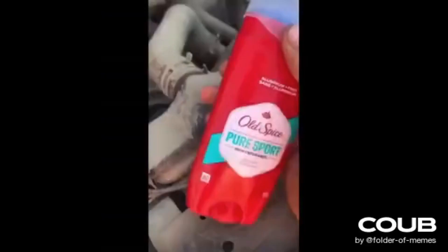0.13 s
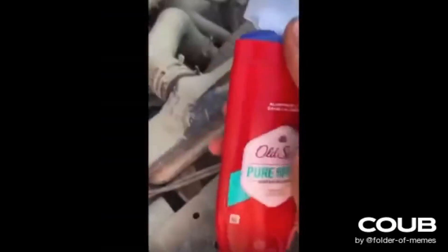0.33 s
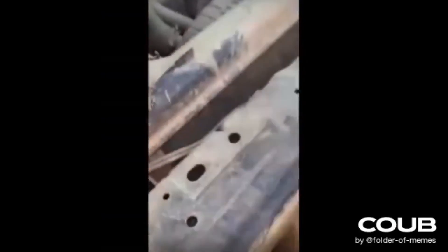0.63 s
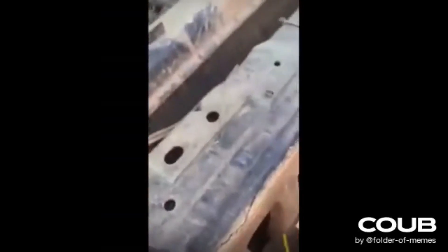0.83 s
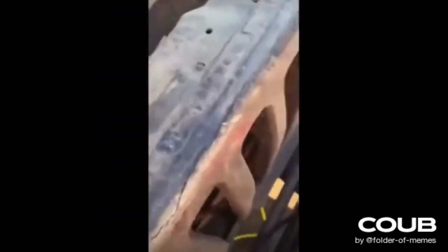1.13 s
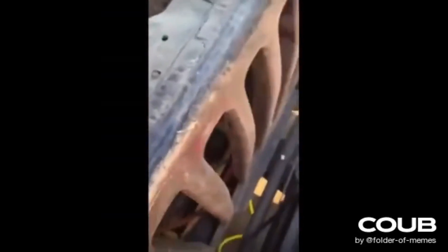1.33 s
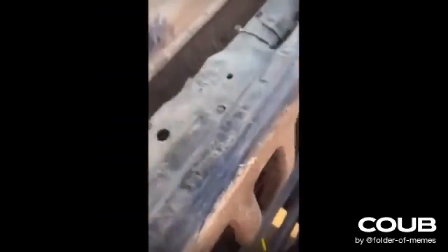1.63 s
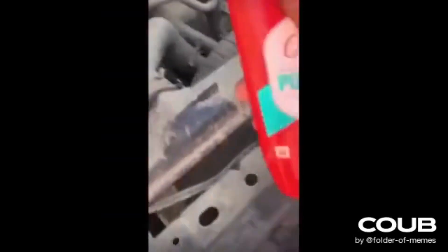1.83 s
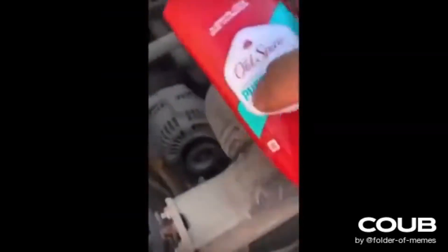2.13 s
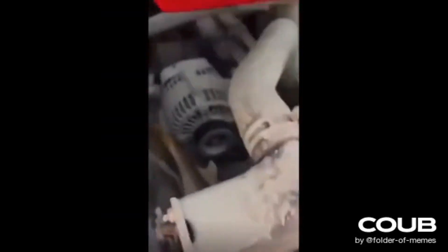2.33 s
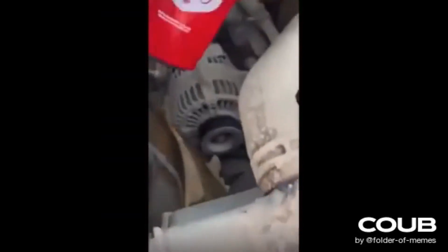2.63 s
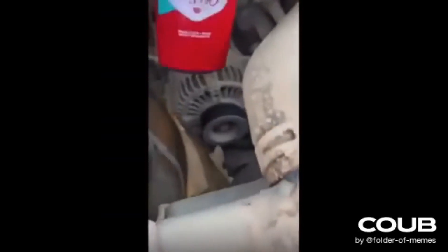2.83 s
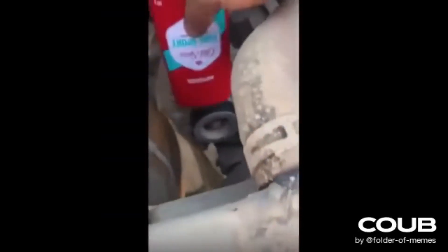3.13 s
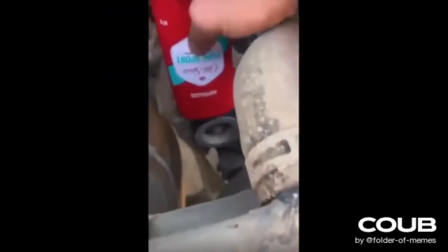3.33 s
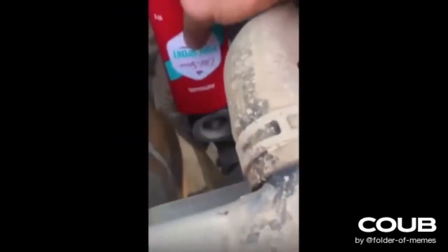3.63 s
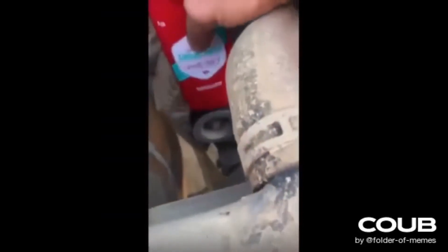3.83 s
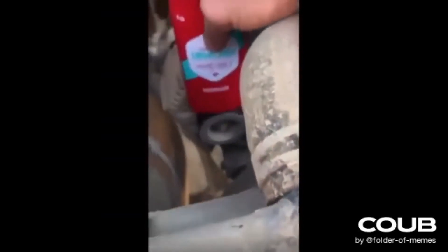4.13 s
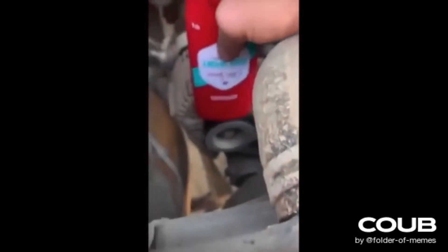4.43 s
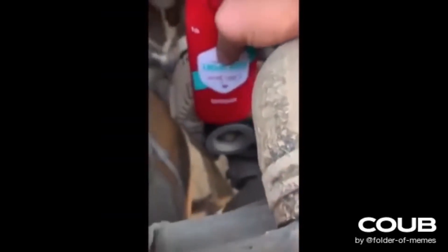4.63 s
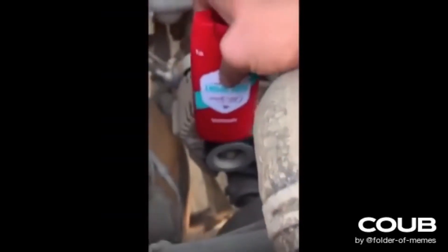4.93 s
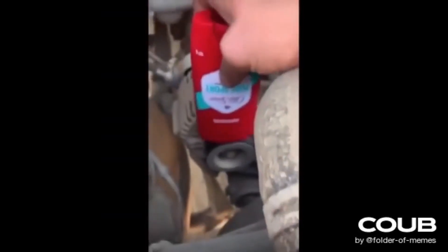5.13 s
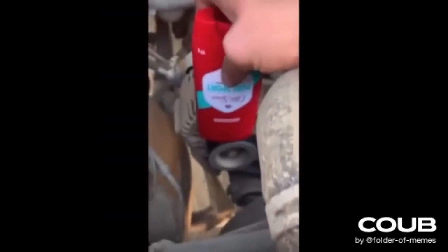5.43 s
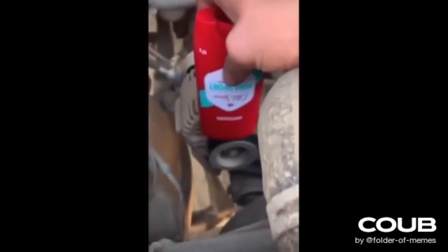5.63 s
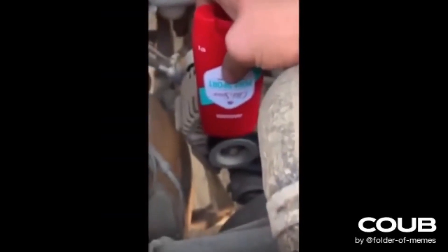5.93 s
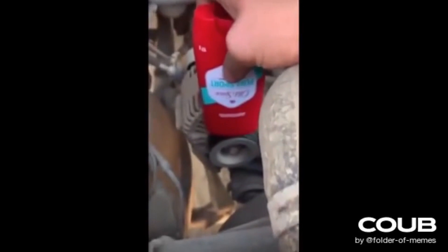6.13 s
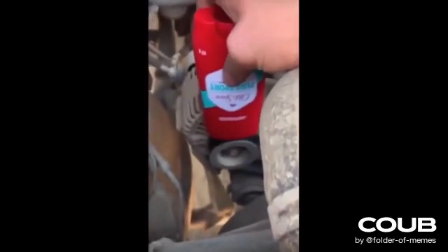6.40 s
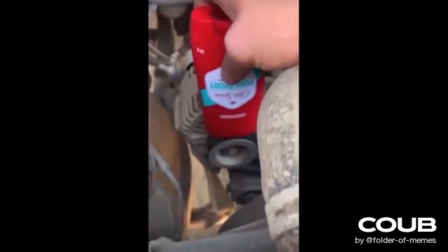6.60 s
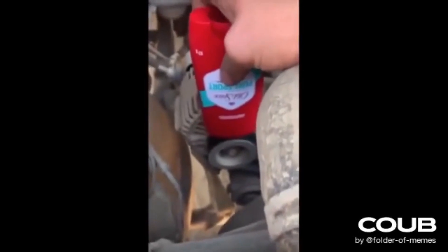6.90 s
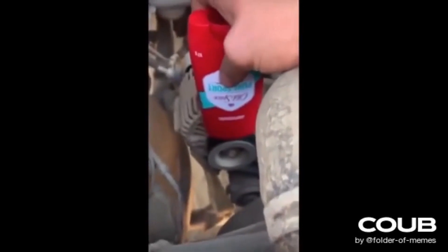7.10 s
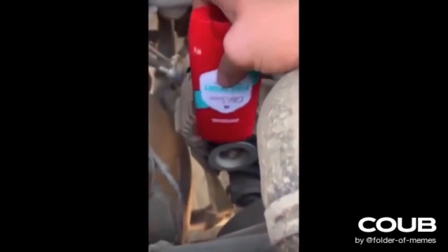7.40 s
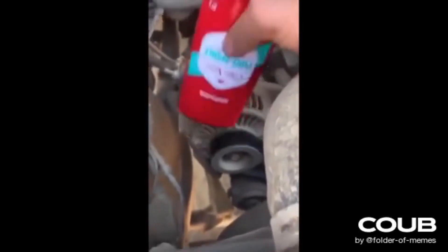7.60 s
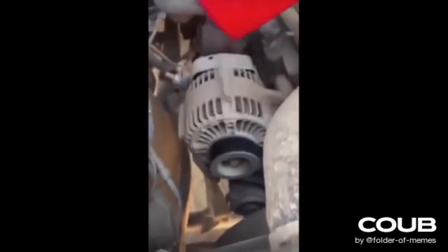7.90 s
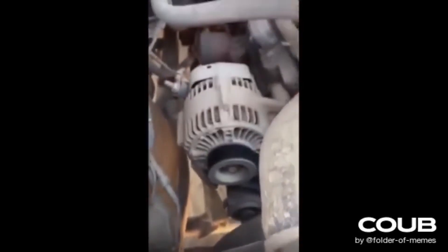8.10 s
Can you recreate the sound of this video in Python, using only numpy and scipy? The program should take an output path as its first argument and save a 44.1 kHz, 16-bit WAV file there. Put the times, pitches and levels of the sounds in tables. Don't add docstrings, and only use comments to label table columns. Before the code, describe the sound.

A harsh, fast-chattering belt squeal screams over an idling engine, breaks into scattered chirps, then stops, leaving only the rough engine rumble.

```python
import sys
import numpy as np
from scipy import signal
from scipy.io import wavfile
from scipy.ndimage import uniform_filter1d

SR = 44100
rng = np.random.default_rng(int(sys.argv[2]) if len(sys.argv) > 2 else 0)


def generate_wav(signal):
    frames = np.transpose(np.atleast_2d(signal))
    scaled = np.clip(frames, -1, 1) * 32767
    pcm = np.round(scaled).astype(np.int16)
    wavfile.write(sys.argv[1], SR, pcm)


def voltage_ratio(decibels):
    exponent = np.asarray(decibels, float) / 20
    return 10 ** exponent


N = 364089
T = np.arange(N) / SR
YARD_END_S, ENGINE_START_S = 0.062, 0.354
SPLIT_HZ = 6520
LOW_HZ, HIGH_HZ = 3165, 5560
FIRING_HZ = 36.13

# (time [s], distance run [laps])
BELT_LAPS = [(.36, 1.542), (1.2, 5.059), (2, 8.423), (2.8, 11.805), (3.6, 15.166), (4.4, 18.494),
             (5.1, 21.399), (5.8, 24.294), (6.2, 25.96), (6.65, 27.87), (8.3, 34.75)]
# (low bite [dB], low pitch shift [Hz], high bite [dB], high pitch shift [Hz])
BELT_GLAZE = [(2, 60.0, -2, 349.5), (-1.5, 115.0, 2, -200.0), (-3.5, 180.0, 4.7, -150.0),
              (-1.5, 290.0, 1.52, -60.0), (-2.5, 140.0, -0.5, -90.0), (-0.5, -200.0, -4, 20.5),
              (2, -200.0, -3, -40.0), (-2, -100.0, -0.5, -50.5), (-2, -30.0, 0.8, -80.0),
              (0.6, 5.0, 3, -180.0), (2.5, 60.0, 0.3, 0.0), (2.3, 115.0, -0.2, 99.5),
              (0.3, 175.0, -0.3, 200.0), (-0.2, 115.0, 1.3, 220.0), (0.16, 0.0, -1, 260.0),
              (0.2, -5.0, -0.56, 50.0), (-2, -15.0, 2.7, -20.0), (0, -45.0, 0.7, -40.0),
              (0.3, -55.0, 0, -0.5), (-1.2, 0.0, 0.5, -59.5), (1.2, -70.0, 3, -220.0),
              (1, -30.0, 5, -170.0), (-0.8, 20.0, 0.3, 20.5), (-1.5, 45.0, 0.5, 120.0),
              (-0.7, 50.0, -2, 450.0), (3, 110.0, -3.5, 500.0), (3.5, 70.0, -1.7, 400.0),
              (2, 35.0, -1.5, 400.0), (2.5, -95.0, -2, 400.5), (1.5, -25.0, 1.44, 390.0)]
# (time [s], low slip [dB], high slip [dB], slipping share of a turn [0-1], creep between slips [dB])
WAX_STAGES = [
    (.35, -20.5, -20, 0.81, -25),
    (1, -18.5, -23, 0.63, -21.5),
    (1.6, -23.5, -23.5, 0.72, -24.5),
    (2.3, -20, -24, 0.74, -25),
    (3, -19.5, -22.5, 0.64, -23.5),
    (3.7, -17.5, -26.5, 0.79, -26.5),
    (4.3, -18, -26.5, 0.55, -34),
    (5, -22, -33, .5, -38.5),
    (5.75, -19, -37, .4, -44.5),
    (8.3, -20, -40, .3, -50),
]
# (start [s], length [s], low level [dB], high level [dB])
LAST_SLIPS = [(4.377, 0.04, -19, -28.5), (4.441, 0.034, -19.5, -29.5), (4.483, 0.017, -25, -45),
              (4.508, 0.035, -19, -30), (4.585, 0.012, -15.5, -30), (4.638, 0.038, -25, -37),
              (4.716, .023, -19, -27.5), (4.782, .021, -27, -29), (4.839, 0.041, -19.5, -30.5),
              (4.919, 0.0092, -12.5, -36), (4.973, 0.033, -18.5, -32), (5.048, 0.031, -25, -45),
              (5.099, 0.0076, -23, -45), (5.115, 0.016, -17.5, -31.5), (5.171, 0.04, -22, -38),
              (5.239, 0.054, -30.5, -35.5), (5.318, 0.016, -16.5, -33), (5.385, .018, -21, -34),
              (5.443, 0.025, -19, -29), (5.515, 0.013, -19.5, -42), (5.577, 0.022, -19, -33.5),
              (5.646, 0.014, -18, -43), (5.703, 0.017, -20, -42), (5.928, .015, -26, -38.5),
              (6.048, 0.012, -38, -55), (6.174, 0.012, -20, -40), (6.52, 0.016, -34, -55),
              (6.646, .024, -26, -50), (6.772, .014, -26.5, -47), (6.9, .03, -33, -50)]
# (time [s], extra side mode level [dB])
WAXED_SIDE_MODE = [(5.4, -0.5), (6.0, 5)]
# (frequency [Hz], density [dB per Hz])
RUBBER_RASP = [(880, -39.5), (1500, -40.5), (1740, -21), (2600, -10.5), (3220, -5.5), (4150, -14.5),
               (4840, -11.5), (5480, -11), (6160, -14.5), (6600, -8.5), (8580, -52.5), (14500, -120)]
# (time [s], rumble level [dB], fan and valve roar level [dB])
ENGINE_BAY = [(.35, -22, -27.5), (.8, -24.5, -30), (1.3, -25, -30), (1.8, -24.5, -29), (2.7, -26, -31),
              (3.3, -26.5, -33), (3.9, -28.5, -34), (4.6, -30, -34.5), (5.9, -29, -31.5), (6.5, -27, -29),
              (7.3, -26, -28.5), (8.3, -26, -27.5)]
# (frequency [Hz], density [dB per Hz])
ENGINE_RUMBLE = [(20, -30), (33, -22), (72, -6), (180, -3.5), (377, -4.5), (432, -8.5), (565, -6.5),
                 (647, -16.5), (900, -18.5), (1200, -36)]
# (frequency [Hz], density [dB per Hz])
FAN_ROAR = [(350, -25.5), (600, -10.5), (637, -5), (933, -9), (1270, -6), (1860, -5.5), (2100, -6),
            (2650, -9), (3270, -15.5), (4790, -20.5), (6600, -24.5), (8580, -57.5), (14500, -120)]
# (time [s], third level [dB], fifth level [dB], seventh level [dB])
HALF_ORDERS = [(.35, -30, -55, -24.5), (1.2, -29.5, -45.5, -33), (2.2, -28.5, -37.5, -31),
               (3.2, -27.5, -38, -33), (4.4, -32, -37, -34.5), (5.6, -29, -34, -32.5),
               (6.6, -28.5, -29.5, -29), (7.1, -25.5, -35, -26.5), (7.6, -29, -21.5, -36.5),
               (8.3, -23, -38, -27.5)]
HALF_ORDER_HZ = [53.9, 90.5, 127.4]
# (time [s], peak level [dB], frequency [Hz])
SMALL_KNOCKS = [
    (1.584, 14, 1992),
    (1.711, 14, 1987),
    (5.583, -15, 2000),
    (6.209, -10, 2000),
]
# (frequency [Hz], density [dB per Hz])
YARD_RUMBLE = [(30, -15.5), (120, -1.5), (170, -9), (300, -23), (900, -30.5), (1250, -27.5), (3000, -39.5),
               (13000, -58)]
# (frequency [Hz], density [dB per Hz])
FOLLOWING_TREBLE = [(6500, -50), (6530, -4), (6900, 0), (7400, -4), (8300, -8), (8330, -60)]
# (start [s], end [s])
LAST_BAND_SPANS = [(.35, 1.56), (1.92, 2.54), (2.66, 2.72), (3.1, 3.17), (3.88, 3.93), (4.2, 4.35),
                   (4.85, 4.95), (5.3, 5.36), (5.57, 5.62), (5.74, 8.3)]
# (start [s], end [s], frequency [Hz], level [dB])
WHISTLES = [
    (.5, .75, 9819, -62),
    (1.6, 1.92, 7752, -50),
    (2.87, 3.58, 7752, -50),
    (2.66, 2.71, 8556, -52),
]


def belt():
    start, length, low_db, high_db = slip_rows().T
    creep = voltage_ratio(curve(WAX_STAGES, column=4) + glaze(column=0))
    low = np.hypot(slips(start, length, low_db, 770), creep) * voltage_ratio(glaze(column=0))
    high_length = np.maximum(0.86 * length, 0.029)
    high = slips(start - 0.0039, high_length, high_db, 830)
    high = np.hypot(high, creep * voltage_ratio(-8)) * voltage_ratio(glaze(column=2))

    low_swing = 1.3 * np.interp(T, [1.5, 5.5], [1.15, 0.65])
    low_hz = LOW_HZ + low_swing * glaze(column=1)
    high_hz = HIGH_HZ + 1.1 * glaze(column=3)
    chatter_hz = np.interp(T, [1.8, 2.6], [65, 35])

    low_main_db = -1.0 - 0.01 * abs(low_hz - LOW_HZ)
    low_main = voltage_ratio(low_main_db) * tone(low_hz + chatter_hz * wander(40), 120, 0.5)
    low_side_db = -17.5 + curve(WAXED_SIDE_MODE, column=1) + 0.05 * glaze(column=1) + 3.4 * wander(29)
    low_side = voltage_ratio(low_side_db) * tone(3640 + 60 * wander(40), 91, 0.12)

    mode_hop = np.cos(2 * np.pi * (high_hz - 5570) / 420)
    high_main_db = -5.5 + 3.0 * mode_hop + 2.1 * wander(30)
    high_main = voltage_ratio(high_main_db) * tone(high_hz + 1.7 * chatter_hz * wander(60), 150, 0.4)
    high_side_db = -16.5 + 0.0338 * glaze(column=3) + 4.0 * wander(21)
    high_side = voltage_ratio(high_side_db) * tone(6250 + 120 * wander(30), 120, 0.41)

    rasp = np.hypot(low * voltage_ratio(-12), high * 0.85) * shaped(RUBBER_RASP, patchy_db=3.5)
    out = low * (low_main + low_side) + high * (high_main + high_side) + rasp
    return ring(ring(out, 3170, 60, -5), 5590, 110, -5)


def slip_rows():
    s, laps = np.transpose(BELT_LAPS)
    turns = np.arange(100) - 0.34
    start = np.interp(0.0378 + 0.2754 * turns, laps, s, 0)
    start = start[(start > ENGINE_START_S) & (start < 4.35)]
    at, low_db, high_db, share, _ = np.transpose(WAX_STAGES)
    luck_db = 1.5 * rng.standard_normal((len(start), 2))
    length = np.gradient(start) * np.interp(start, at, share)
    low = np.interp(start, at, low_db) + luck_db[:, 0]
    high = np.interp(start, at, high_db) + luck_db[:, 1]
    return np.r_[np.c_[start, length, low, high], LAST_SLIPS]


def slips(starts, lengths, levels_db, release_db):
    level = np.zeros(N)
    for s, length, db in zip(starts, lengths, levels_db):
        t = np.arange(-0.005, length + 0.04, 1 / SR)
        first = round((s - 0.005) * SR)
        at = slice(first, first + len(t))
        catch = np.clip((t + 0.0041) / 0.01, 0, 1) ** 2
        release = voltage_ratio(-release_db * np.maximum(t - 0.89 * length, 0))
        held = voltage_ratio(db + 2.0 - 3.7 * np.clip(t / length, 0, 1))
        level[at] = np.hypot(level[at], held * catch * release)
    return level


def glaze(column):
    values = np.array(BELT_GLAZE)[:, column]
    place = curve(BELT_LAPS, 1) % 1 * len(values)
    return np.interp(place, np.arange(len(values) + 1), np.r_[values, values[0]])


def ring(x, hz, width_hz, db):
    return x + voltage_ratio(db) * signal.lfilter(*signal.iirpeak(hz, hz / width_hz, SR), x)


def engine():
    speed = 1 + 0.009 * wander(2.5)
    crank = np.pi * np.cumsum(FIRING_HZ * speed) / SR
    flicker = voltage_ratio(0.58 * wander(90))
    rumble = voltage_ratio(curve(ENGINE_BAY, 1)) * shaped(ENGINE_RUMBLE, patchy_db=1.0)
    roar = voltage_ratio(curve(ENGINE_BAY, 2)) * shaped(FAN_ROAR, patchy_db=1.54)
    out = rumble * (1 + 0.068 * np.cos(2 * crank)) * flicker
    out += roar * (1 + 0.024 * np.cos(2 * crank)) * flicker
    lope = 1 + 0.5 * np.cos(crank + 1.5 * wander(4))
    for k, hz in enumerate(HALF_ORDER_HZ):
        out += voltage_ratio(curve(HALF_ORDERS, k + 1) - 2) * tone(hz * speed, 14, 0.74) * lope
    return out


def knocks():
    out, t = np.zeros(N), np.arange(900) / SR
    for s, db, hz in SMALL_KNOCKS:
        crack = 0.74 * rng.standard_normal(len(t)) * voltage_ratio(-4000 * t)
        body = np.sin(2 * np.pi * hz * t) + crack
        attack = np.clip(t / 0.00081, 0, 1)
        out[round(s * SR):][:len(t)] += voltage_ratio(db - 16.5 - 8700 * t) * body * attack
    return out


def yard():
    level_db = -28 - 3000 * np.maximum(T - YARD_END_S, 0) - 29 * (T > YARD_END_S)
    return voltage_ratio(level_db) * shaped(YARD_RUMBLE, patchy_db=-1.0)


def treble(x):
    band = signal.sosfilt(signal.butter(4, [4500, SPLIT_HZ], "band", fs=SR, output="sos"), x)
    quick = np.sqrt(abs(uniform_filter1d(band ** 2, size=350))) + 1e-9
    slow = np.sqrt(abs(uniform_filter1d(quick ** 2, size=20000)) + 1e-18)
    follow = slow ** 0.72 * (quick / slow) ** 0.68
    reach = sum(np.clip(np.minimum(T - s, end - T) / 0.013, 0, 1) for s, end in LAST_BAND_SPANS)
    last = shaped([(8270, -60), (8300, 0), (8950, -4), (9000, -60)], patchy_db=1.5)
    body = shaped(FOLLOWING_TREBLE, patchy_db=1.5)
    out = voltage_ratio(-22.5) * follow * (body + voltage_ratio(-10) * reach * last)
    for s, end, hz, db in WHISTLES:
        fade = np.clip(np.minimum(T - s, end - T) / 0.01, 0, 1)
        out += voltage_ratio(db) * fade * np.sin(2 * np.pi * hz * T)
    return out


def strips(x, chance, low_hz, under_db, depth, size):
    hz, _, z = signal.stft(x, SR, nperseg=1024, noverlap=768)
    power = uniform_filter1d(uniform_filter1d(abs(z) ** 2, size=4, axis=0), size=12, axis=1)
    weak = power < voltage_ratio(-2 * under_db) * uniform_filter1d(power, size=90, axis=0)
    luck = rng.random((z.shape[1] // 4 + 2, 513 // size + 1)).T
    luck = np.minimum(luck[:, 1:], luck[:, :-1])
    luck = luck.repeat(size, axis=0).repeat(4, axis=1)[:513, :z.shape[1]]
    keep = 1 - depth * weak * (luck < chance) * (hz > low_hz)[:, None]
    keep = uniform_filter1d(keep, size=3, axis=1)
    return signal.istft(z * keep, SR, nperseg=1024, noverlap=768)[1][:N]


def evened(x):
    return x / np.sqrt(np.mean(x ** 2) + 1e-20)


def curve(rows, column):
    rows = np.array(rows)
    return np.interp(T, rows[:, 0], rows[:, column])


def shaped(points, patchy_db):
    frames, hz = N // 256 + 5, np.fft.rfftfreq(1024, 1 / SR)
    a, b, patches = rng.standard_normal((frames, 513, 3)).T
    patches = uniform_filter1d(uniform_filter1d(patches, size=10, axis=0), size=10, axis=1)
    f, db = np.transpose(points)
    density_db = np.interp(np.log(hz + 1), np.log(f + 1), db, -90, -90)
    z = (a + 1j * b) * voltage_ratio(density_db[:, None] + patchy_db * evened(patches))
    return evened(signal.istft(z, nperseg=1024, noverlap=768)[1][:N])


def wander(hz):
    low_pass = signal.butter(2, hz, fs=SR, output="sos")
    return evened(signal.sosfilt(low_pass, rng.standard_normal(N)))


def tone(hz, width_hz, clean):
    size = clean + (1 - clean) * (wander(width_hz) + 1j * wander(width_hz))
    phase = 2j * np.pi * np.cumsum(hz * np.ones(N)) / SR
    return evened((size * np.exp(phase)).real)


def scene():
    bay = np.tanh(belt() + engine() + knocks())
    bay = strips(bay, 0.2, 3400, 7, 0.65, size=3)
    below_split = signal.oaconvolve(bay, signal.firwin(801, SPLIT_HZ, fs=SR), "same")
    bay = below_split + treble(bay)
    opening = np.clip((T - ENGINE_START_S) / 0.0016, 0, 1)
    return np.array([1, 1])[:, None] * (bay * opening + yard())


def top_cut(x):
    return signal.sosfilt(signal.butter(12, 15690, fs=SR, output="sos"), x)


def record(dry):
    colour = [(8250, -62), (8500, 3.5), (9500, -3), (13000, -2.5), (15600, -7.5), (15750, -61)]  # Hz, dB per Hz
    mid = voltage_ratio(-53 + 3.0 * wander(3)) * strips(shaped(colour, patchy_db=4.0), 0.45, 0, -40, 1, size=12)
    side = voltage_ratio(-53 + 2.0 * wander(3)) * strips(shaped(colour, patchy_db=4.0), 0.2, 0, -40, 1, size=6)
    loudness = np.sqrt(abs(uniform_filter1d(dry[0] ** 2, size=30000)))
    dust_level = voltage_ratio(15 - 3.5 * np.clip(T - 3.6, 0, 1)) * loudness ** 0.89
    dust = dust_level * np.array([mid + side, mid - side]) * (T > ENGINE_START_S)
    return top_cut(dry + dust)


dry = scene()
out = record(dry)
generate_wav(out)
```